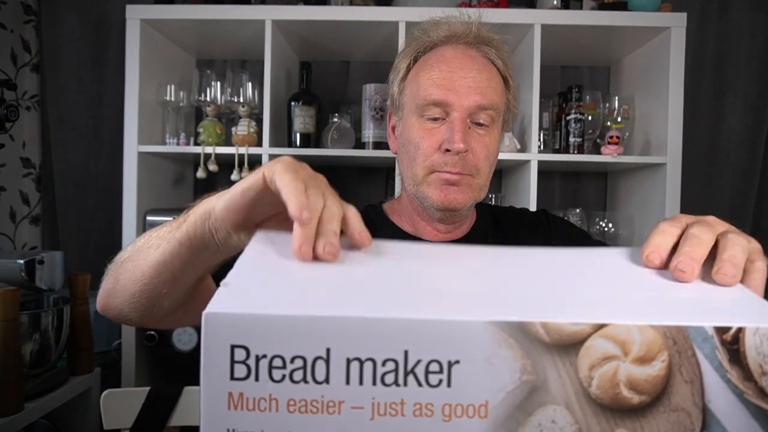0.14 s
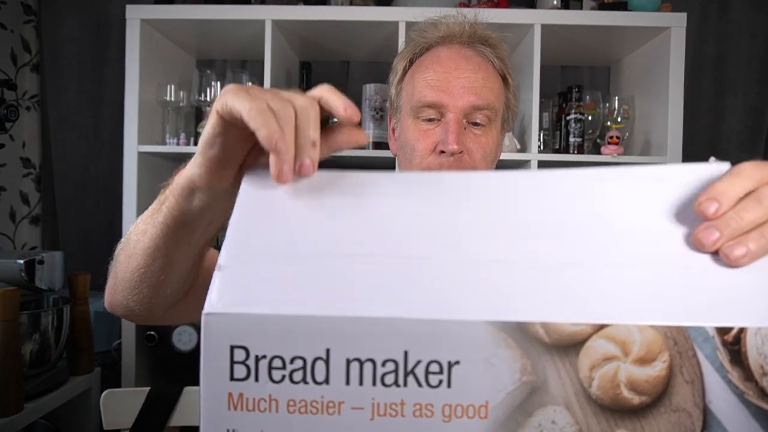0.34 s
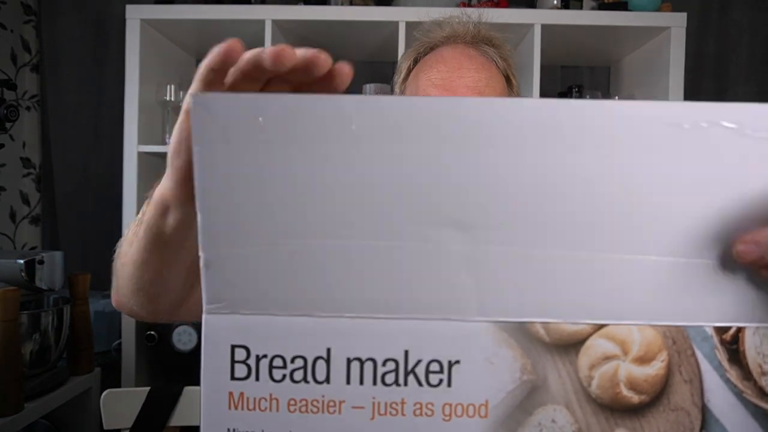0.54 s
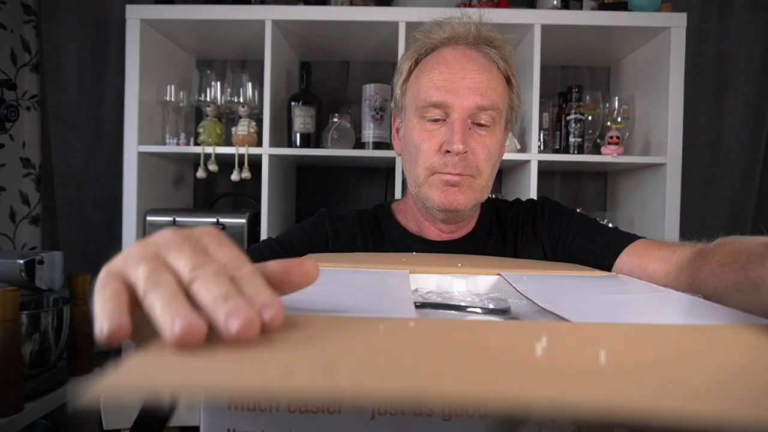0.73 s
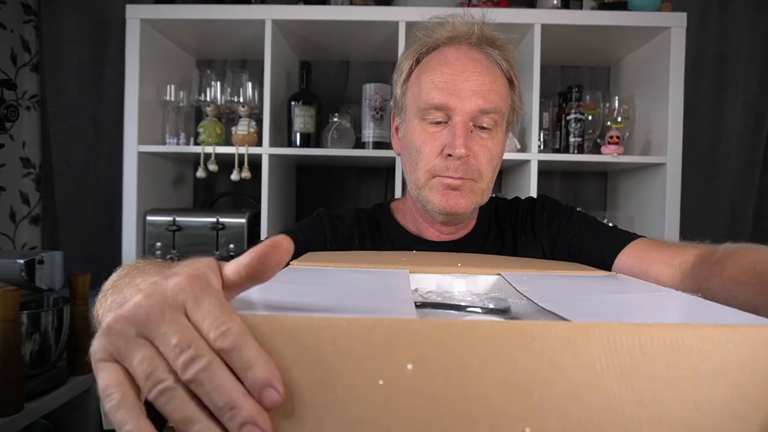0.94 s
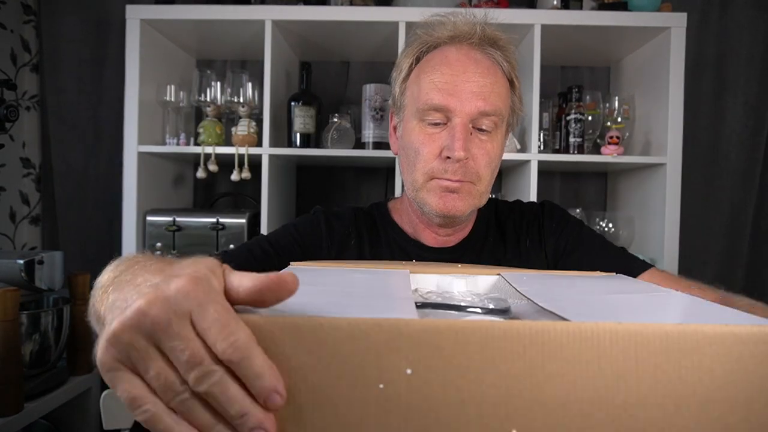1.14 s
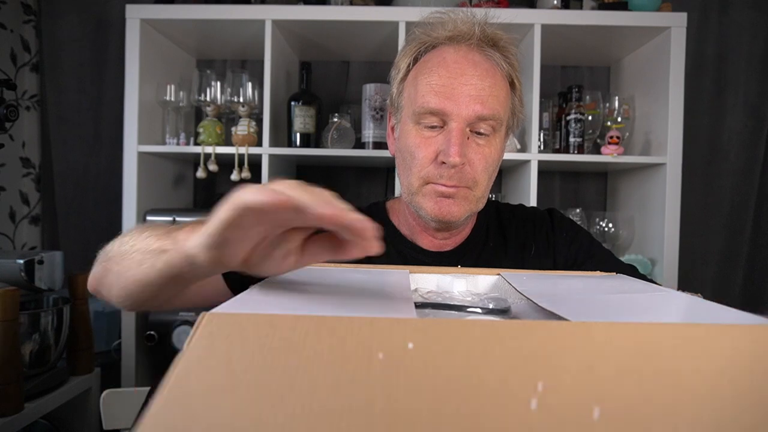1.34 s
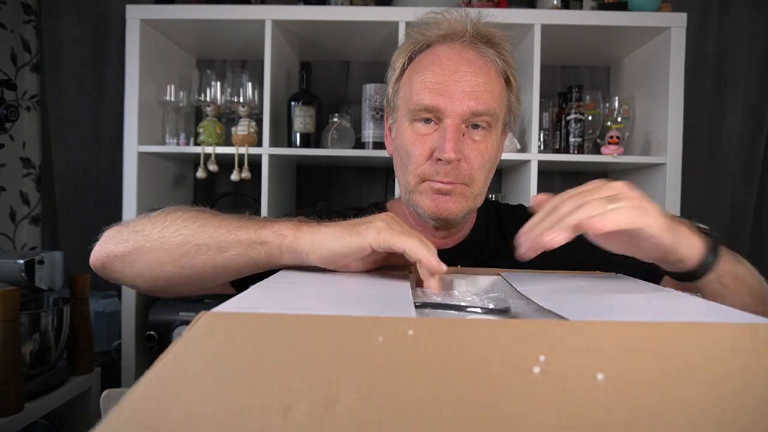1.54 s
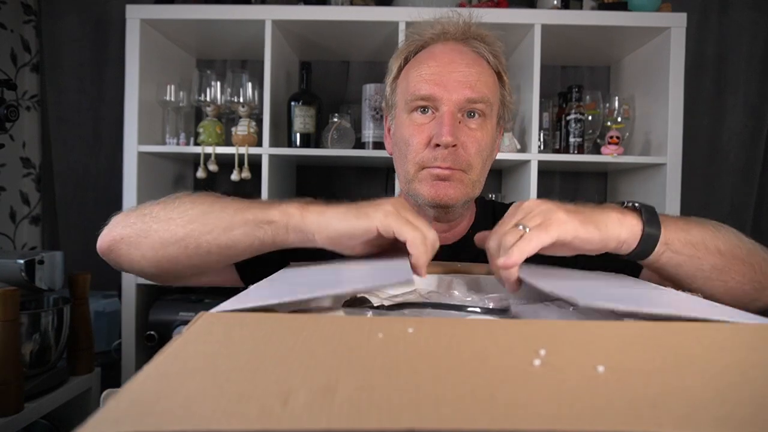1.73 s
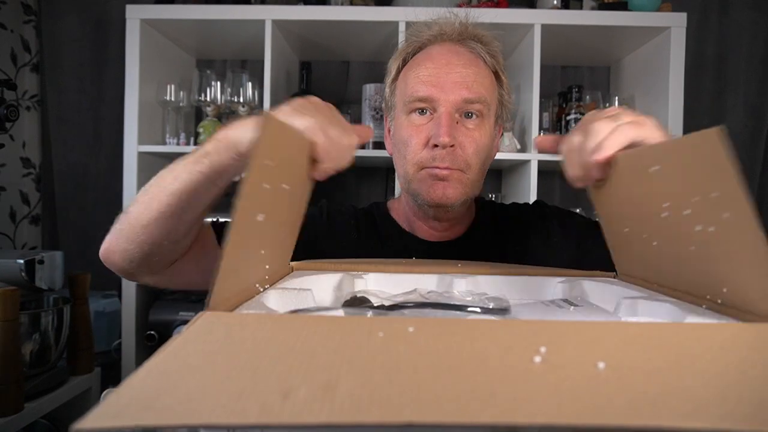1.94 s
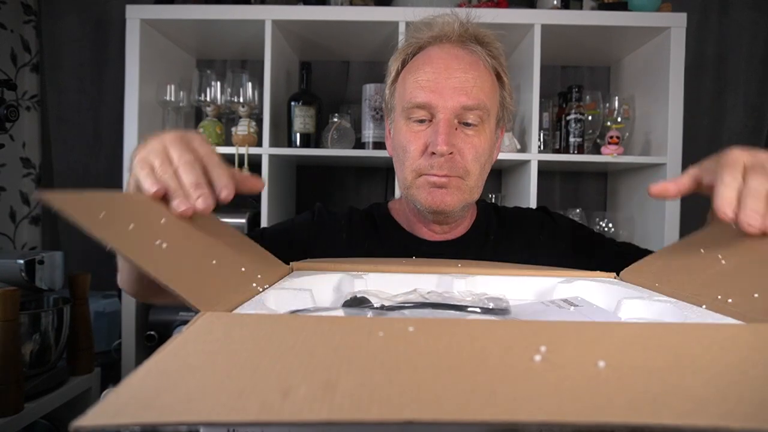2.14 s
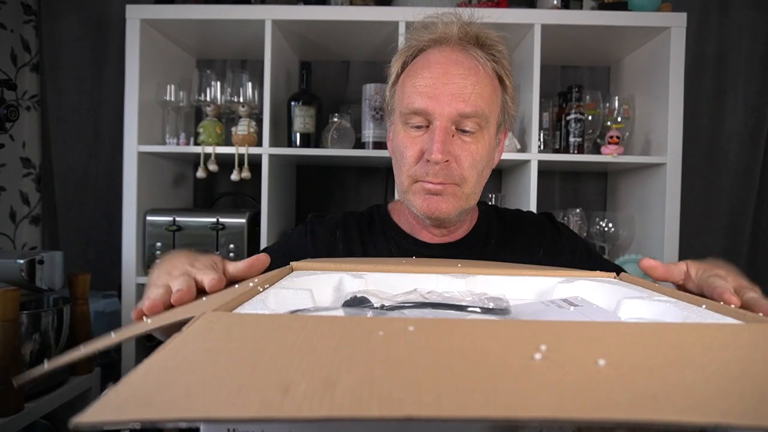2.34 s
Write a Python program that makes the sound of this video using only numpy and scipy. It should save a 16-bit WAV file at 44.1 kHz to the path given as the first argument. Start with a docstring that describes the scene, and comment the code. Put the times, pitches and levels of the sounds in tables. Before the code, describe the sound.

Cardboard box flaps are opened by hand, close and dry in a quiet room. Rubbing starts at once; a soft knock comes near 0.12 s, then crackling snaps, hollow knocks and deep thumps at 0.25 and 0.4 s. Scraping grows brighter and strongest around 1.1-1.35 s, nearly stops near 1.45 s, resumes with small scuffs and sharp ticks until 2.13 s, then soft rubbing fades over faint table rumble.

```python
"""Hands fold back the flaps of a cardboard box close to a microphone on the same table.
From the start, fingers and flaps rub over the card: noisy grains hiss, and the panels drone along.
A soft knock and thump come first, then crackling snaps, ringing knocks and the strongest thumps near 0.25 and 0.4 s.
More strokes follow, with a quieter stretch near 1.45 s; after the last thump, rubbing closes the scene.
A noise rumble in the table and a faint room hush lie under it all."""
import sys
import numpy as np
from scipy import signal
from scipy.fft import rfft, irfft
from scipy.io import wavfile

SR = 44100
rng = np.random.default_rng(int(sys.argv[2]) if len(sys.argv) > 2 else 0)


def transcribe(signal):
    """Save signal, clipped to [-1, 1], as a 16-bit WAV file at the path in sys.argv[1]."""
    frames = np.atleast_2d(signal).T
    limited = np.clip(frames, -1, 1)
    pcm = np.round(limited * 32767).astype(np.int16)
    wavfile.write(sys.argv[1], SR, pcm)


N = 105840  # samples: 2.4 s


def amp(db):
    """Decibels to gain."""
    return 10 ** (np.asarray(db) / 20)


def rms_one(x):
    """Scale to an rms (average strength) of 1."""
    return x / np.sqrt(np.mean(x ** 2) + 1e-20)


def in_time(rows):
    """Join the points of each table column by straight lines, one value per sample."""
    times, *columns = np.transpose(rows)
    t = np.arange(N) / SR
    return [np.interp(t, times, column) for column in columns]


def coloured(x, spectrum):
    """Shape x by a table of f/Hz and level/dB, fading out beyond both ends; rms 1."""
    hz, db = np.transpose(spectrum)
    log_f = np.log(np.arange(N // 2 + 1) * SR / N + 1)  # the 1 avoids the log of zero
    below = np.maximum(np.log(hz[0]) - log_f, 0)
    above = np.maximum(log_f - np.log(hz[-1]), 0)
    gain = amp(np.interp(log_f, np.log(hz), db)) * np.exp(-8 * (below + above))
    return rms_one(irfft(rfft(x) * gain, N))


def drift(rate_hz):
    """Smooth random wander of rms 1; a higher rate wanders faster."""
    r = np.exp(-2 * np.pi * rate_hz / SR)
    noise = rng.standard_normal(N + SR)
    settled = signal.lfilter([1], [1, -2 * r, r * r], noise)[SR:]  # drop the filter's start
    return rms_one(settled)


def grains(count, rate, spread_db):
    """Random clicks, about rate per second, of uneven size and either sign."""
    draw = rng.random((count, 3))
    happens = draw[:, 0] < rate / SR
    size = amp(-spread_db * np.log(1 - draw[:, 1] * .995))  # many small, few large
    return happens * size * np.sign(draw[:, 2] - .5)


# Hands and flaps sliding on card, one list a stroke; levels before their random flicker:
# (t/s, hiss level/dB, hiss top level/dB, panel drone level/dB, low drone level/dB)
RUB_STROKES = [
    [(0.0, -50, -47, -61, -50), (0.032, -51, -58.5, -61, -83), (0.144, -42.5, -41, -60, -55),
     (0.214, -44, -44, -56, -66), (0.238, -37, -39, -51, -45)],
    [(0.268, -35.5, -44, -42, -51.5), (0.278, -41.5, -43, -49, -45), (0.338, -40.5, -44, -55, -62),
     (0.377, -56, -61, -60, -66)],
    [(0.41, -47.5, -41, -47, -44.5), (0.458, -58, -57, -63.5, -66), (0.528, -55, -55, -61, -67),
     (0.545, -57, -66, -67, -62)],
    [(0.552, -45, -42, -60, -47.5), (0.558, -45, -48, -59, -62), (0.61, -48.5, -50, -54, -60),
     (0.628, -52.5, -58, -48.5, -68), (0.655, -57, -58, -53.5, -69)],
    [(0.67, -44, -46, -48, -53), (0.68, -51, -55, -55, -58), (0.724, -37.5, -37, -56, -54),
     (0.748, -40.5, -36, -46.5, -75), (0.76, -46, -54, -56, -64)],
    [(0.765, -44, -43.5, -54.5, -52), (0.823, -49.5, -46, -62, -60.5), (0.855, -48.5, -45.5, -63.5, -64),
     (0.925, -45, -45.5, -55.5, -55.5)],
    [(0.94, -46.5, -42, -55, -63), (0.99, -44, -39, -58.5, -78), (1.012, -45, -38, -53.5, -65),
     (1.032, -45.5, -40, -57.5, -65), (1.1, -45.5, -36.5, -53, -72)],
    [(1.112, -37.5, -40, -44, -82), (1.127, -41, -34, -55, -63), (1.134, -36.5, -37, -42, -43),
     (1.172, -38.5, -42.5, -53.5, -53), (1.225, -41.5, -38, -51, -61)],
    [(1.235, -39, -38, -49, -46), (1.257, -36.5, -35, -48.5, -61), (1.295, -41.5, -39, -48.5, -52),
     (1.333, -33.5, -33.5, -44, -66), (1.348, -43.5, -37, -46.5, -58)],
    [(1.355, -52.5, -47, -56, -67), (1.391, -54, -55, -57.5, -61), (1.413, -62, -61, -66.5, -72),
     (1.529, -61, -64, -70, -71), (1.54, -65, -67, -70, -69)],
    [(1.55, -49, -42, -51, -50.5), (1.56, -39, -50, -53.5, -63), (1.585, -48.5, -50, -56, -77)],
    [(1.59, -49, -62, -51, -54), (1.602, -49, -58, -64, -64), (1.622, -44.5, -54, -53.5, -63),
     (1.635, -58, -71, -69, -64)],
    [(1.64, -60, -71, -76, -75), (1.656, -54, -56, -55, -56), (1.668, -59.5, -70, -67, -64),
     (1.68, -47.5, -67, -55.5, -59)],
    [(1.71, -43, -49, -55.5, -60.5), (1.796, -51, -53, -54.5, -67), (1.814, -57, -68, -63, -59),
     (1.832, -53, -50, -52.5, -70), (1.853, -56.5, -62, -64, -47)],
    [(1.862, -46, -54, -45, -46.5), (1.878, -46, -52, -50, -60), (1.893, -45, -53.5, -54.5, -45)],
    [(1.92, -46.5, -46, -51.5, -54.5), (1.96, -56, -58, -65.5, -61), (1.984, -47, -53, -58.5, -54),
     (2.01, -46, -43, -50, -54), (2.025, -47.5, -63, -64, -57)],
    [(2.04, -67, -44, -62, -73), (2.062, -58, -57, -73, -77)],
    [(2.075, -62, -48, -79, -68), (2.085, -57, -50, -71, -58), (2.101, -49.5, -49, -74, -92),
     (2.113, -45, -46, -70, -92), (2.125, -50.5, -65, -64, -76)],
    [(2.135, -43.5, -43, -59.5, -87), (2.203, -43.5, -48, -60.5, -75), (2.257, -45, -44, -57, -58.5),
     (2.371, -49.5, -51, -60.5, -85), (2.4, -51, -55, -62, -73)],
]
# Colour of the sliding hiss: (f/Hz, relative level/dB)
HISS_COLOUR = [(1350, -67), (2300, -20), (3080, -16), (3620, -12.5), (4550, -9.5), (5480, -6.5),
               (6820, -5.5), (8430, -2.5), (13300, -1.5), (15100, -10.5), (16000, -6)]
# Colour of the low drone: (f/Hz, relative level/dB)
LOW_COLOUR = [(82, 7.5), (140, 2), (193, -5.5), (311, -3.5), (497, -13), (600, -11.5), (780, -11.5)]
GRAINS_PER_S, GRAIN_SPREAD_DB = 9000, 2.0
HISS_SPLIT_HZ = 8070  # the hiss above this has its own level


def rubbing():
    """Dense grains and noise make the hiss; the same clumped friction drives the panels."""
    hiss_db, top_db, drone_db, low_db = in_time(np.concatenate(RUB_STROKES))
    clump = drift(19)

    raw_hiss = grains(N, GRAINS_PER_S, GRAIN_SPREAD_DB) + rng.standard_normal(N)
    hiss = coloured(raw_hiss, HISS_COLOUR)
    low_pass = signal.butter(3, HISS_SPLIT_HZ, "low", fs=SR, output="sos")
    high_pass = signal.butter(3, HISS_SPLIT_HZ, "high", fs=SR, output="sos")
    lower = rms_one(signal.sosfilt(low_pass, hiss))
    top = rms_one(signal.sosfilt(high_pass, hiss))
    hiss_flicker = amp(1.34 * clump + 0.84 * drift(190))
    sliding = hiss_flicker * (amp(hiss_db) * lower - amp(top_db) * top)

    drone = amp(drone_db + 0.93 * clump + 1.2 * drift(22)) * panel_drone()
    low_noise = coloured(rng.standard_normal(N), LOW_COLOUR)
    low_drone = amp(low_db + 1.1 * drift(22)) * low_noise
    return sliding + drone + low_drone


# Colour of the droning panels: (f/Hz, relative level/dB)
DRONE_COLOUR = [(320, -70), (550, -44), (648, -6), (845, -2.5), (1160, -4), (1390, -2.5), (1650, -4),
                (1820, -5.5), (2300, -10.5), (3640, -19)]
DRONE_WIDTH = .1  # width of each resonance as a share of its pitch
DRONE_PATCHY_DB, DRONE_RING_SHARE = 5.0, 1.2


def panel_drone():
    """Friction noise in which each panel mode (way of vibrating) swells and fades by itself."""
    noise = rng.standard_normal(N)
    rings = np.zeros(N)
    for hz, _, _ in PANEL_MODES:
        resonance = signal.lfilter(*signal.iirpeak(hz, 1 / DRONE_WIDTH, SR), noise)
        rings += amp(DRONE_PATCHY_DB * drift(6.1)) * resonance
    return coloured(noise + DRONE_RING_SHARE * rings, DRONE_COLOUR)


# Fibres and creases snap: (t/s, peak level/dB, centre f/Hz, length of the click cluster/s)
SNAP_EVENTS = [(.2355, -27, 6000, .002), (.2428, -21, 4500, .002), (.2441, -17, 6000, .001),
               (.2463, -16, 8400, .0015), (.250, -22, 7000, .002), (.2577, -15, 7000, .003),
               (.2606, -17, 8000, .003), (.2645, -24, 5500, .003), (.2722, -18, 9800, .0015),
               (.381, -33, 9500, .001), (.3934, -20, 7500, .002), (.396, -11, 11500, .003),
               (.3988, -13, 12500, .0012), (.4008, -15, 12800, .0014), (.4033, -27, 8000, .003),
               (.5232, -32, 7900, .003), (.548, -33, 6000, .0015), (.591, -29, 12000, .002),
               (.659, -30, 7500, .002), (.6649, -31, 6800, .003), (.7472, -21, 8500, .0015),
               (.8355, -28, 7000, .002), (.9328, -18, 11500, .002), (.9557, -25, 8300, .002),
               (1.0028, -19, 6000, .002), (1.010, -23, 6500, .003), (1.1069, -22, 4000, .001),
               (1.1092, -19, 5300, .002), (1.4451, -33, 12800, .002), (1.5455, -38, 8000, .002),
               (1.5478, -31, 4500, .002), (1.5612, -23, 6000, .002), (1.591, -29, 6000, .018),
               (1.5952, -28, 6000, .002), (1.6015, -28, 6800, .006), (1.681, -33, 4500, .003),
               (1.6893, -22, 9000, .001), (1.696, -19, 9000, .001), (1.7055, -21, 8700, .0008),
               (1.7215, -26, 6000, .003), (1.8866, -10, 12500, .001), (1.8872, -23, 5500, .002),
               (1.9132, -14, 12500, .0008), (2.0318, -22, 9600, .001), (2.0672, -23, 12800, .0015),
               (2.0976, -34, 8500, .001), (2.1296, -19, 12700, .001)]
SNAP_WIDTH = .55  # the band runs from centre / 1.55 to centre * 1.55
SNAP_CLICKS_PER_S, SNAP_RING_Q, SNAP_RING_SHARE = 7000, 8, 1.5
SNAP_TAIL_DB, SNAP_TAIL_S = -20, .004  # noise level before filtering, time to fall to 37 %


def snaps():
    """A short click cluster in a broad resonance rings a little at its centre, with a faint dying tail."""
    out = np.zeros(N + SR)
    t = np.arange(2600) / SR
    for start_s, db, hz, length in SNAP_EVENTS:
        clicks = grains(len(t), SNAP_CLICKS_PER_S, 1.24) * np.exp(-(t / length) ** 3)
        clicks[0] = 3  # a sure first click
        tail = amp(SNAP_TAIL_DB) * rng.standard_normal(len(t)) * np.exp(-t / SNAP_TAIL_S)
        edges = np.clip([hz / (1 + SNAP_WIDTH), hz * (1 + SNAP_WIDTH)], 100, .45 * SR)
        burst = signal.lfilter(*signal.butter(1, edges, "band", fs=SR), clicks + tail)
        ring = signal.lfilter(*signal.iirpeak(hz, SNAP_RING_Q, SR), burst)
        burst = burst + SNAP_RING_SHARE * ring
        i = int(start_s * SR)
        out[i:i + len(t)] += amp(db) * burst / np.abs(burst).max()
    return out[:N]


# Knocks on the panels: (t/s, peak level/dB, centre f/Hz, length of the contact/s, spread/octaves)
KNOCK_EVENTS = [(.124, -41, 450, 0.0038, 1.1), (0.2425, -31, 820, 0.0022, 0.2),
                (0.242, -32.5, 2100, 0.0041, 0.23), (.261, -37, 1320, 0.0055, 0.86),
                (.271, -38.5, 790, 0.0068, 0.17), (0.395, -24.5, 1560, 0.0019, 0.22),
                (.403, -30, 740, 0.0061, 1.34), (0.546, -39, 1350, 0.00088, 0.95),
                (0.664, -30.5, 1080, 0.00069, 1), (0.698, -39.5, 835, 0.0021, 0.35),
                (0.909, -40, 1140, 0.0061, 0.18), (1.1068, -28.5, 1330, 0.00031, 1),
                (1.1092, -28.5, 1290, 0.00079, 0.79), (1.1305, -24.5, 1480, 0.00087, 0.7),
                (1.136, -32, 700, 0.0079, 0.82), (1.252, -33, 1400, 0.018, 0.11),
                (1.328, -34, 1890, 0.0049, 0.18), (1.383, -53, 998, .002, 0.16),
                (1.5475, -39.5, 1580, 0.0008, 0.3), (1.755, -34.5, 1320, 0.02, .5),
                (1.859, -36.5, 593, 0.023, 0.74), (1.887, -35, 1420, 0.0026, 0.14),
                (1.914, -37.5, 1400, 0.0018, 0.43), (1.985, -45, 924, 0.012, 0.14)]
# Modes of the panels, also used by the drone: (f/Hz, relative level/dB, time to fall by 60 dB/s)
PANEL_MODES = [(220, 6, 0.016), (325, -12, 0.027), (601, -10, 0.043), (830, -2, 0.032), (969, -9, 0.044),
               (1156, -9.5, 0.019), (1330, 0, 0.018), (1595, -1.5, 0.02), (1848, -7.5, 0.021),
               (2180, -7.5, 0.015), (2675, -11, 0.01), (3130, -12, 0.012), (3670, 10, 0.015)]
MODE_SPREAD_DB = 1.5  # chance unevenness of the modes


def knocks():
    """A short rough contact strikes the panel modes, favouring those near the knock's centre frequency."""
    out = np.zeros(N + SR)
    t = np.arange(5000) / SR
    hz, level_db, t60 = np.transpose(PANEL_MODES)[:, :, None]
    for start_s, db, centre_hz, length, octaves in KNOCK_EVENTS:
        uneven_db = level_db + MODE_SPREAD_DB * rng.standard_normal(hz.shape)
        strength = amp(uneven_db) / (1 + (np.log2(hz / centre_hz) / octaves) ** 4)
        sign = rng.choice([-1, 1], hz.shape)
        modes = strength * amp(-60 * t / t60) * np.sin(2 * np.pi * hz * t) * sign
        first_hit = 6 * (t == 0)
        contact = (rng.standard_normal(len(t)) + first_hit) * np.exp(-(t / length) ** 2)
        # every moment of the contact sets the modes ringing
        ring = signal.fftconvolve(modes.sum(axis=0), contact)[:len(t)]
        i = int(start_s * SR)
        out[i:i + len(t)] += amp(db) * ring / np.abs(ring).max()
    return out[:N]


# Thumps through the table: (t/s, level at the crest of the swell/dB, f/Hz, cycles to the crest)
THUMP_EVENTS = [(0.125, -35, 81, 0.58), (0.666, -37, 106, 0.94), (.40, -35.5, 144, 1.6),
                (0.241, -32, 160, 0.62), (0.229, -16, 37.8, 1.37), (0.267, -7.5, 36.5, 0.53),
                (0.395, -11.5, 53.5, 0.62), (0.574, -19, 21.2, 0.45), (0.701, -24.5, 55, 0.64),
                (0.774, -38, 63, 0.44), (0.908, -27.5, 64.4, 0.78), (1.107, -38.5, 80, 1.2),
                (1.128, -38, 150, 0.55), (1.134, -28, 47.5, 0.98), (1.561, -32.5, 43, 0.27),
                (1.66, -44.5, 116, 1.5), (1.241, -33, 24.7, 0.78), (1.278, -29.5, 17.2, 0.96),
                (1.719, -25.5, 17.7, 1.12), (1.787, -38, 29, .8), (1.867, -42.5, 168, 1.9),
                (2.056, -28.5, 31, 0.44), (2.25, -45, 99, 1.6)]
# The table trembles: (t/s, level/dB)
RUMBLE_LEVEL = [(0.0, -43.5), (0.23, -35), (0.4, -33), (0.47, -33), (0.93, -39), (1.29, -37.5),
                (1.4, -41.5), (1.58, -31), (1.72, -31.5), (1.91, -39), (2.05, -45.5), (2.27, -45.5),
                (2.4, -42.5)]
# Colour of the trembling: (f/Hz, relative level/dB)
RUMBLE_TONE = [(12, 6.5), (22, -5), (38, -6.5), (55, -15.5), (75, -21.5), (110, -62)]


def table():
    """Thumps swell and die within a few cycles over a wandering rumble."""
    rumble_db, = in_time(RUMBLE_LEVEL)
    out = amp(rumble_db) * coloured(rng.standard_normal(N), RUMBLE_TONE)
    t = np.arange(N) / SR
    for start_s, db, hz, cycles in THUMP_EVENTS:
        turns = np.maximum(t - start_s, 0) * hz
        swell = (turns / cycles) ** 2 * np.exp(2 - 2 * turns / cycles)  # reaches 1 at the crest
        out = out - amp(db) * swell * np.sin(2 * np.pi * turns)
    return out


# Colour of the room's hush: (f/Hz, relative level/dB)
ROOM_COLOUR = [(90, 7.5), (140, -18.5), (300, -19.5), (700, -22.5), (2500, -22.5), (9000, -20),
               (15200, -44)]
ROOM_DB = -61


def room():
    """Steady coloured noise stands for the hush of the room."""
    return amp(ROOM_DB) * coloured(rng.standard_normal(N), ROOM_COLOUR)


def scene():
    """All sources, heard close by, over the hush of the room."""
    mix = rubbing() + snaps() + knocks() + table() + room()
    return mix[None]  # one channel


MIC_PEAK_HZ, MIC_PEAK_WIDTH_HZ, MIC_PEAK_SHARE = 8470, 340, 0.61
CUTOFF_HZ = 16500  # from here up, at least 70 dB weaker


def record(dry):
    """The microphone favours a narrow treble band; the top is cut."""
    peak = signal.iirpeak(MIC_PEAK_HZ, MIC_PEAK_HZ / MIC_PEAK_WIDTH_HZ, SR)
    bright = dry + MIC_PEAK_SHARE * signal.lfilter(*peak, dry)
    top_cut = signal.cheby2(14, 70, CUTOFF_HZ, fs=SR, output="sos")
    return signal.sosfilt(top_cut, bright)


dry = scene()
out = record(dry)
transcribe(out)
```